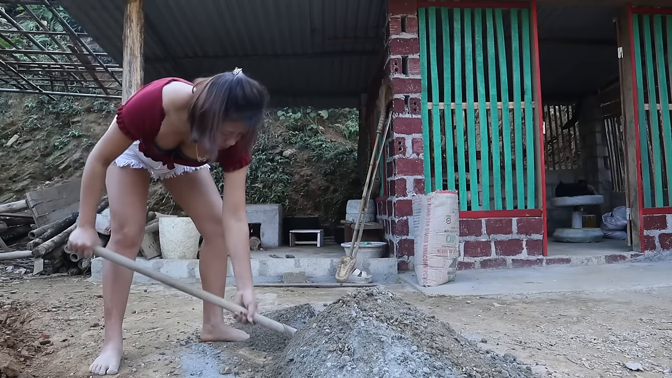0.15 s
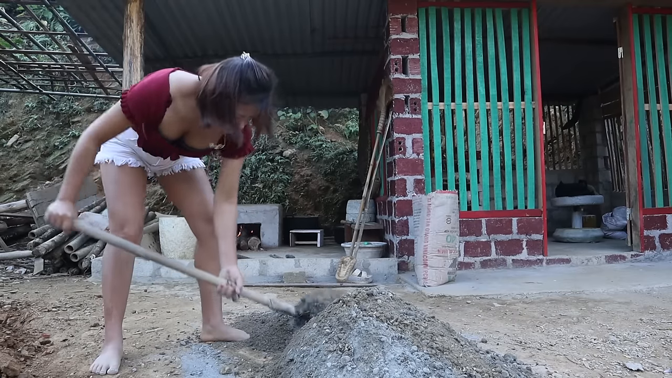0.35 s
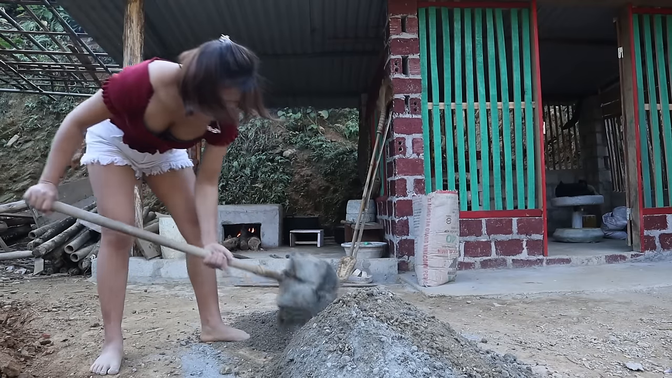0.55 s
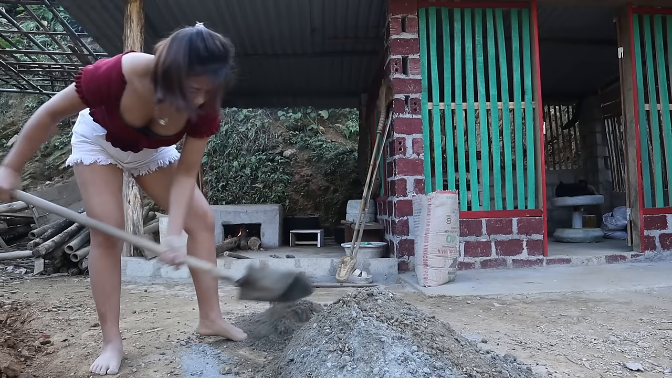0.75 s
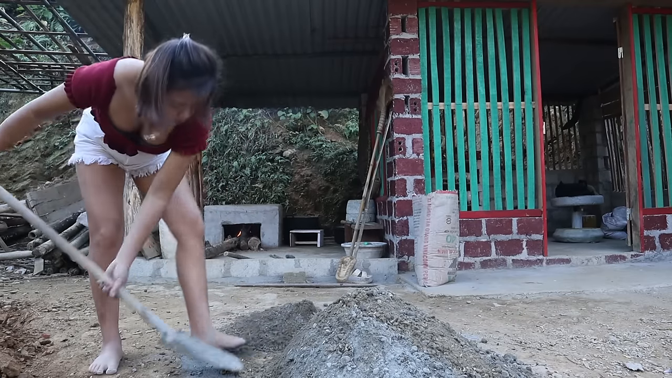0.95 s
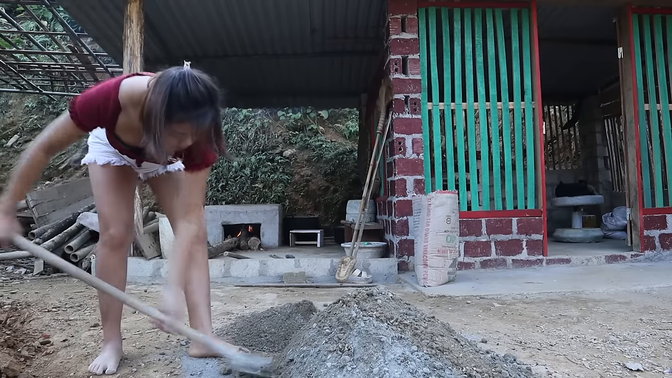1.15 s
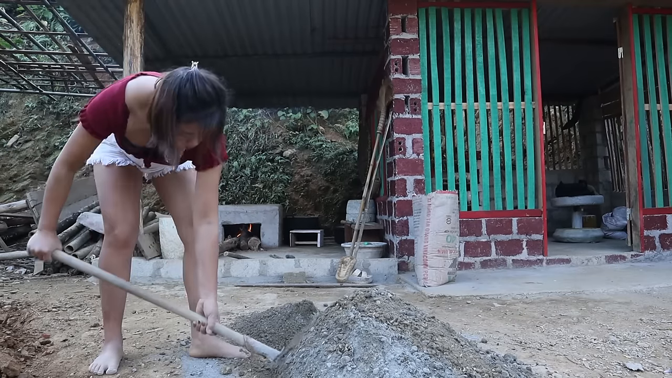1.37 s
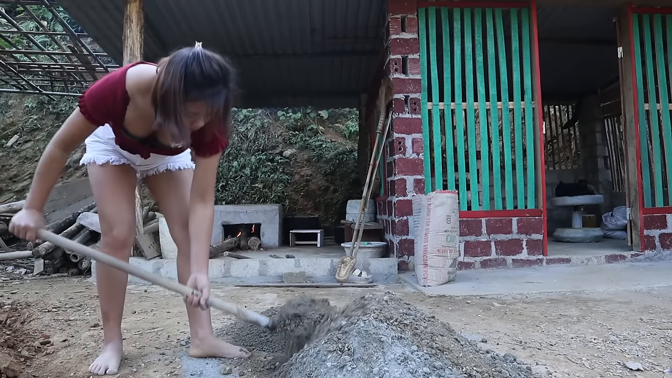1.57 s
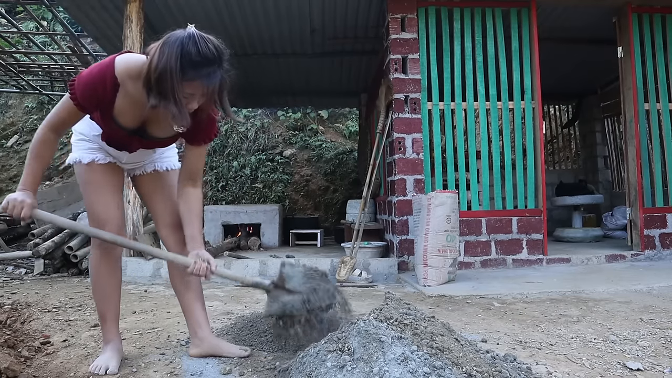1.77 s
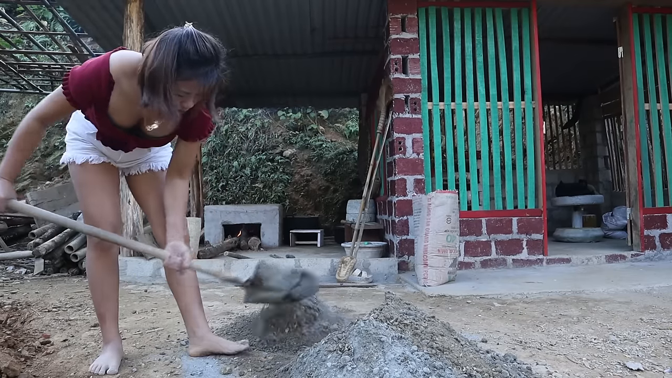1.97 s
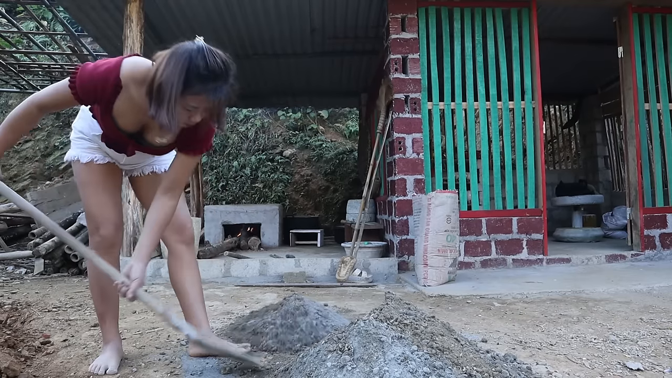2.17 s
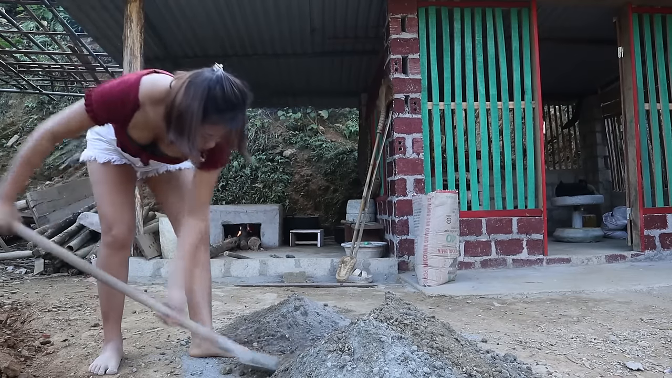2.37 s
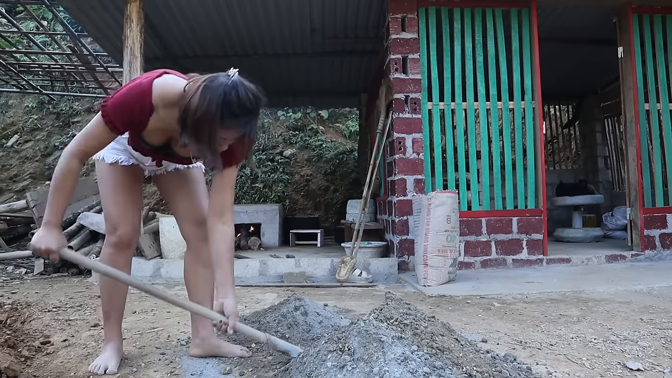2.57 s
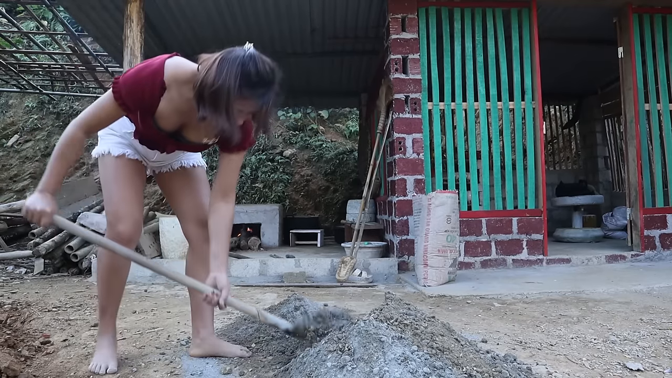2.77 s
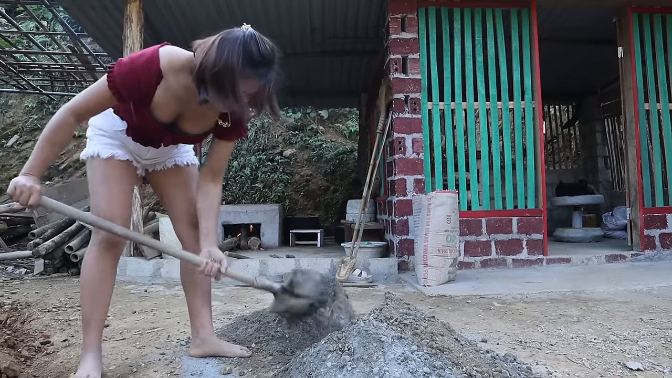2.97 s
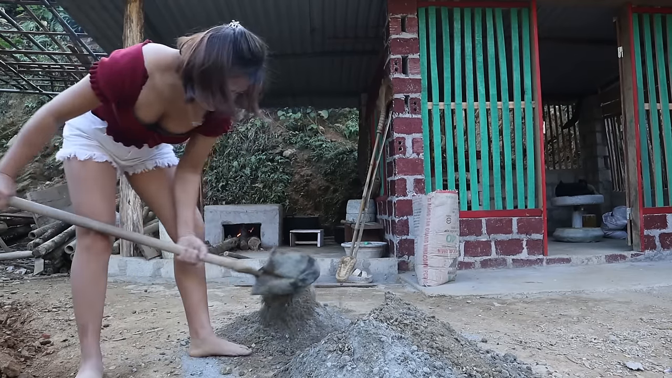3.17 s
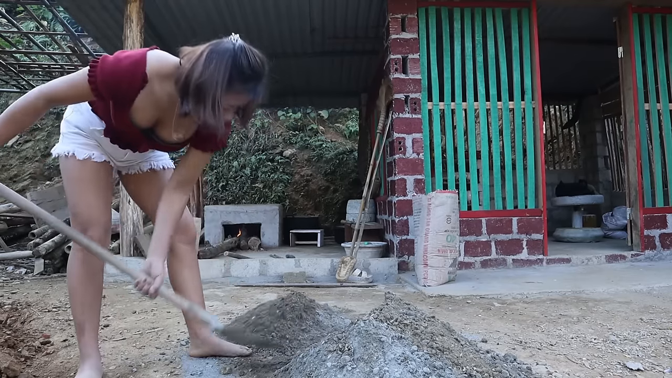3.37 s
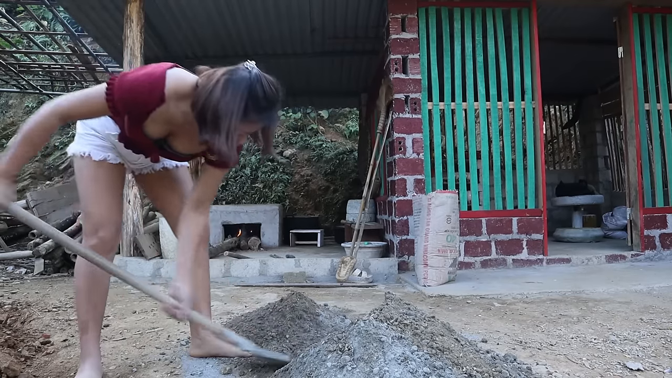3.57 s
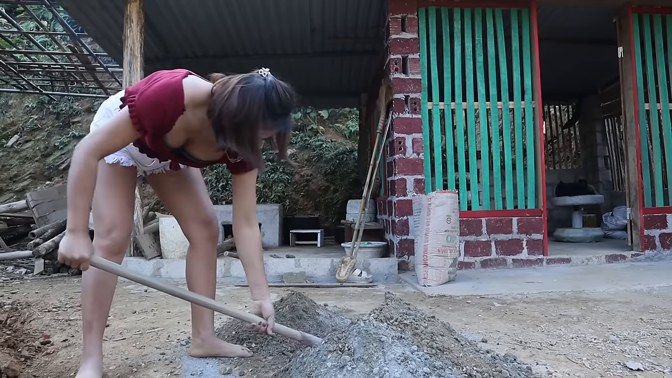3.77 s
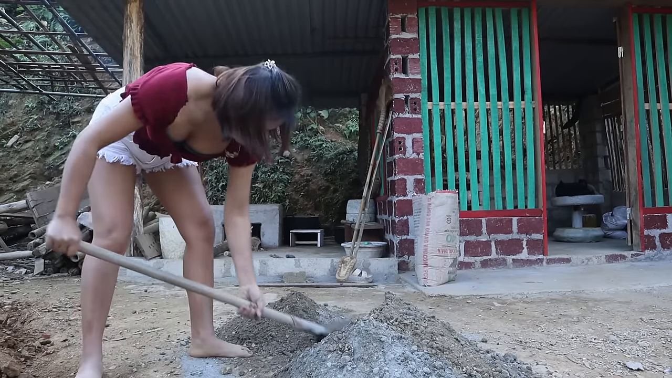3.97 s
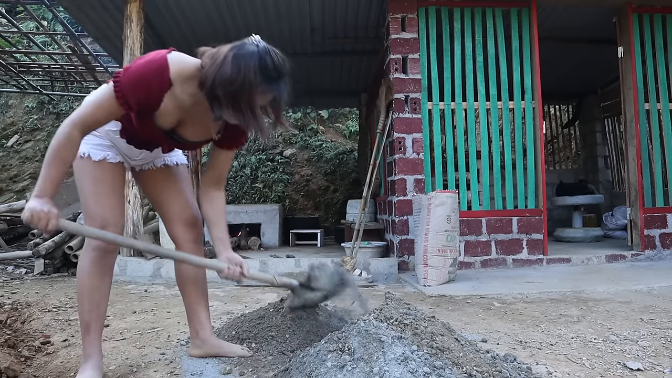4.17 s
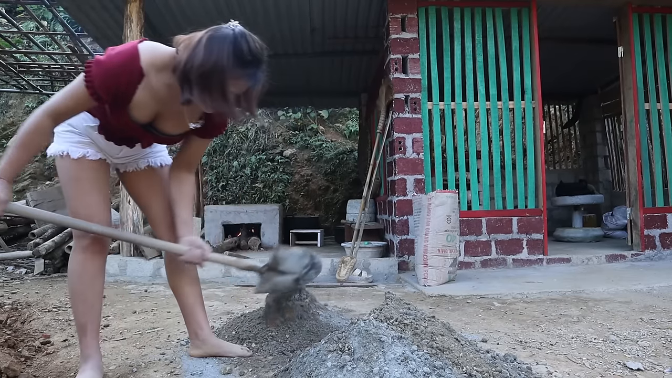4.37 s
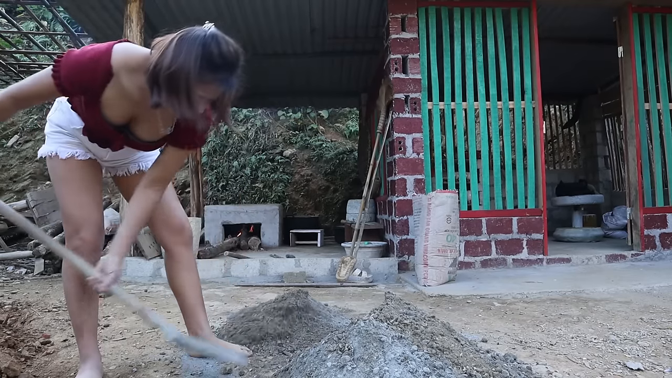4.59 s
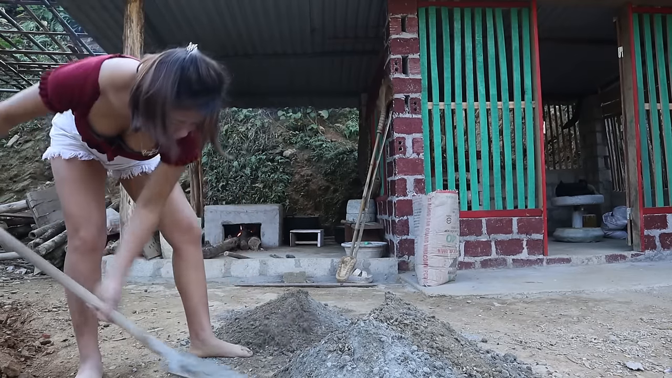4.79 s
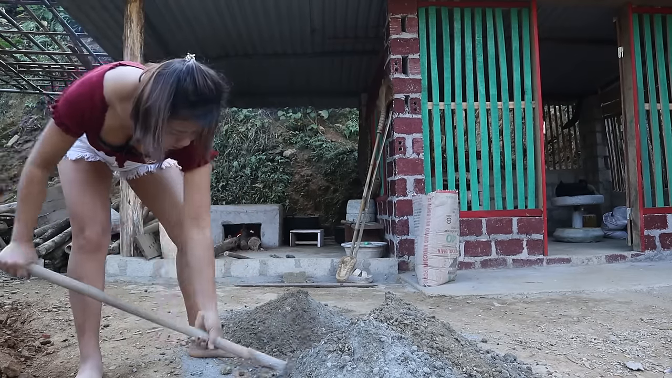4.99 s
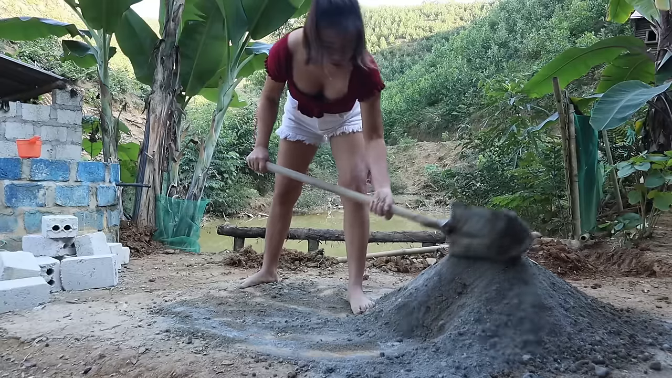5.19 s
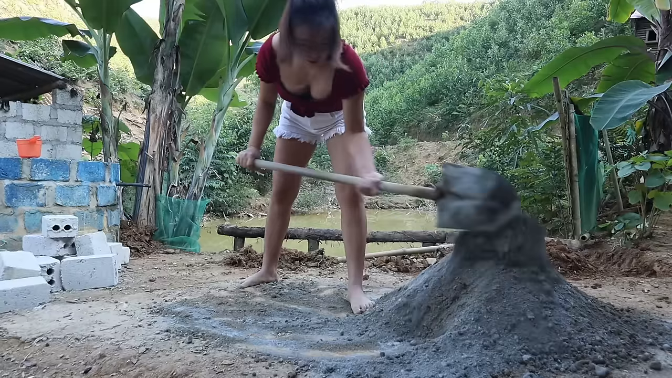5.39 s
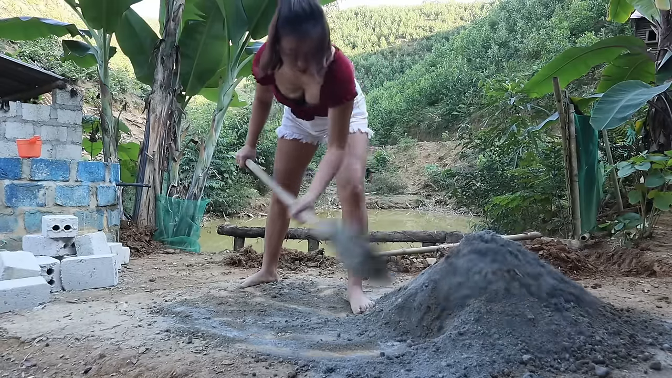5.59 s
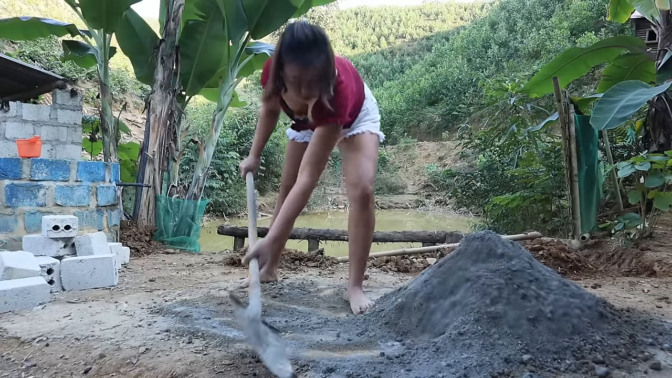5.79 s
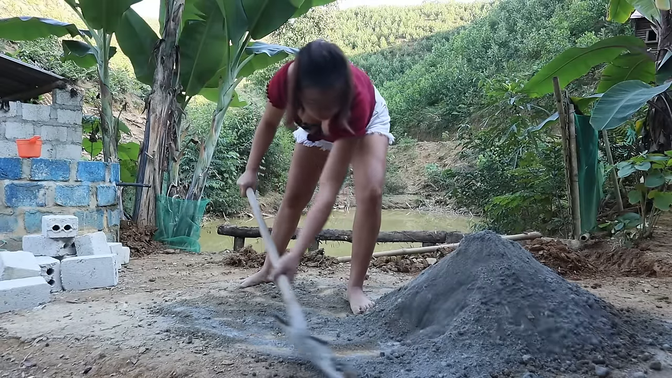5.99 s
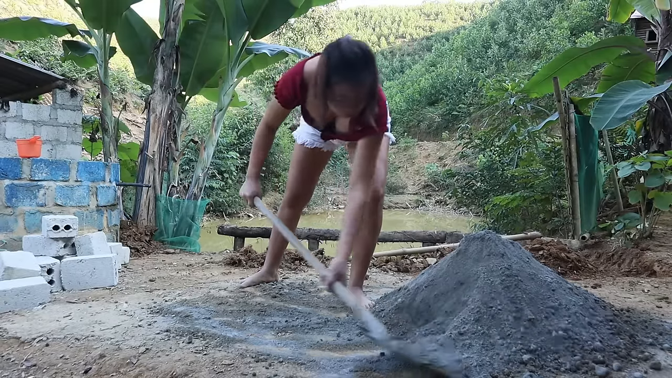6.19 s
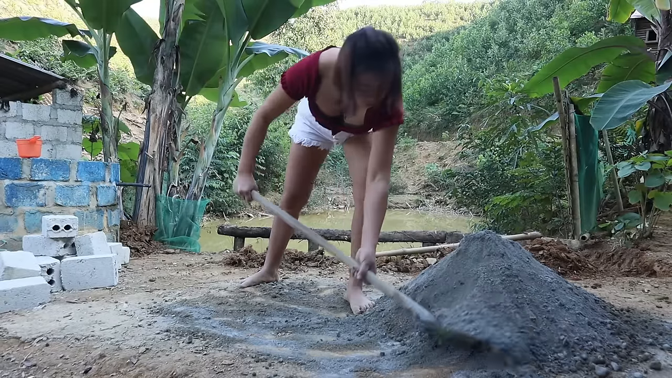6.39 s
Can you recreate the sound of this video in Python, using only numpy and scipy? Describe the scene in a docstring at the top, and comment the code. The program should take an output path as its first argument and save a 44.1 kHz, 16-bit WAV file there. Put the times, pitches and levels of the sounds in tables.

```python
"""A steel shovel turns a heap of dry cement and gravel on hard ground, outdoors, a few metres away.
Again and again the blade lands, grinds under the heap and is tipped out: random grains and short chips
shake the ringing steel, stones knock on it, and sliding mix and sand patter as filtered grains.
After a brief silence the work goes on in a second yard, with a last pour and then a deeper, rasping drag.
Dull knocks, thuds, pebble ticks and a faint ping come between; each yard has its own quiet noisy air."""
import sys
import numpy as np
from scipy import signal
from scipy.fft import rfft, irfft
from scipy.io import wavfile
from scipy.ndimage import uniform_filter1d

SR = 44100
rng = np.random.default_rng(int(sys.argv[2]) if len(sys.argv) > 2 else 0)


def output_pcm(signal):
    """Save a mono or channel-first signal as 16-bit PCM at the path in sys.argv[1].

    Samples are clipped to [-1, 1] before scaling.
    """
    pcm = np.clip(np.atleast_2d(signal).T, -1, 1) * 32767
    wavfile.write(sys.argv[1], SR, np.round(pcm).astype(np.int16))


N = 284004
TIME = np.arange(N) / SR
TAPS = 8192  # length of filters and short bursts, samples
FREQ = np.maximum(np.fft.rfftfreq(TAPS, 1 / SR), 1)  # Hz, kept above zero for logarithms
GAP_START, GAP_END = 5.13, 5.169  # brief silence between the two yards, s

# modes of the blade resting on the ground: f/Hz, width/Hz, lift/dB
BLADE_MODES = [(219, 64, 8), (523.6, 39, 5), (665.4, 88, 7), (734.4, 24, 8), (1022, 36, 8.5),
               (1283, 54, 6.5), (1380, 42, 9.5), (1490, 33, 5.5), (1776, 36, 2.5), (1920, 54, 6.5),
               (1950, 47, -0.5), (2107, 120, 4.5), (2380, 49, 4), (2654, 34, 5.5), (2834, 115, 3.5),
               (3155, 200, 2), (3480, 170, 3.5), (4010, 87, 5), (4600, 85, 3)]


def undb(db):
    """Turn decibels into a plain gain."""
    return 10 ** (np.asarray(db) / 20)


def spectrum(points):
    """Join (Hz, value) points by straight lines on a log-frequency axis."""
    hz, value = np.transpose(points)
    return np.interp(np.log(FREQ), np.log(hz), value)


def resonances(modes):
    """Lift in dB that a set of modes gives to each frequency."""
    return sum(db / (1 + (2 * (FREQ - hz) / width) ** 2) for hz, width, db in modes)


def slope(ratio, order=8):
    """Roll-off in dB where the frequency ratio exceeds one; a higher order is steeper."""
    return -10 * np.log10(1 + ratio ** order)


def response(db):
    """Turn a dB curve into a filter that answers at once (minimum phase), with unit energy."""
    cepstrum = irfft(np.log(undb(db)))
    # folding the second half onto the first leaves nothing before the start
    cepstrum[1:TAPS // 2] *= 2
    cepstrum[TAPS // 2 + 1:] = 0
    h = irfft(np.exp(rfft(cepstrum)))
    return h / np.linalg.norm(h)


def through(x, h):
    """Pass a signal through an impulse response."""
    return signal.fftconvolve(x, h)[:N]


def walk(rate):
    """Smooth random wander with a spread near one; a higher rate wanders faster."""
    k = max(int(SR / rate), 2)
    steps = np.repeat(rng.standard_normal(N // k + 1), k)
    return 1.3 * uniform_filter1d(uniform_filter1d(steps, k), k)[:N]


def envelope(db, active):
    """Gain for a level in dB, silent while not active, with softened edges."""
    return uniform_filter1d(undb(db) * active, size=128)


def add(track, s, sound):
    """Mix a short sound in at time s."""
    start = int(s * SR)
    track[start:start + len(sound)] += sound[:N - start]


def grains(rate, spread_db):
    """Random contacts (rate per second), many small and a few large; rms one."""
    size = undb(spread_db * np.minimum(rng.exponential(size=N), 5))
    hits = rng.random(N) < rate / SR
    x = hits * size * rng.choice([-1, 1], N)
    return x / x.std()


def burst(t60, crack):
    """Force of a blow: one sharp push and a dying chatter of crushed grit."""
    force = rng.standard_normal(TAPS) * undb(-60 * np.arange(TAPS) / SR / t60)
    force[0] = crack
    return force


def shovel(db, body_hz=900, grit_hz=4000):
    """Split the steel's answer into loaded low body, middle ring and the grit at the edge above it."""
    low, high = FREQ / body_hz, FREQ / grit_hz
    ring = response(db + slope(1 / low) + slope(high))
    body = response(db + slope(low))
    grit = response(db + slope(1 / high))
    return ring, body, grit


def scooping_colour():
    """Spectrum in dB of scooping: the force of the contacts plus the modes of the resting blade."""
    # contact force when scooping: f/Hz, level/dB
    force_colour = [(50, -30), (110, -20.5), (170, -11.5), (400, -8.5), (650, -4.5), (880, -7), (1150, -3),
                    (1600, 0), (2500, 1), (4000, -5), (6000, -10.5), (8000, -16), (11000, -23.5),
                    (15000, -40)]
    return spectrum(force_colour) + resonances(BLADE_MODES)


def dragging_colour():
    """Spectrum in dB of dragging: the contact force plus weaker blade modes and those of the pressed edge."""
    # contact force when dragging: f/Hz, level/dB
    force_colour = [(50, -25), (110, -13.5), (220, -5), (400, -5), (700, -1.5), (900, -2.5), (1600, -3),
                    (2600, -0.5), (4000, -9), (6000, -17.5), (8000, -23), (11000, -28), (15000, -48)]
    # shaft and blade pressed on edge against the ground: f/Hz, width/Hz, lift/dB (before the 0.77 below)
    edge_modes = [(122, 20, 20.5), (213, 20, 8.5), (310, 17, 9), (434.5, 22, 11.5), (670, 63, 5),
                  (1040, 27, 9.5), (1468, 50, 10), (2050, 120, 5.5), (2680, 110, -0.5), (3370, 83, 6.5)]
    return spectrum(force_colour) + 0.79 * resonances(BLADE_MODES) + 0.77 * resonances(edge_modes)


def effort(s, build_s, hold_s, contact_db, release_db_per_s):
    """The push builds from first contact, holds, then eases off, while the blade fills; both in dB."""
    rounding_s = 0.025  # how gently the push turns into its release
    empty_body_db, loading_db_per_s = -6, 27  # low body when empty; its gain while the push eases
    building = np.clip((TIME - s) / build_s, 0, 1)
    filling = np.clip((TIME - s) / (build_s + hold_s), 0, 1)
    past = np.maximum(TIME - s - build_s - hold_s, 0)
    easing_s = np.hypot(past, rounding_s) - rounding_s
    push_db = contact_db * (1 - building) - release_db_per_s * easing_s
    load_db = empty_body_db * (1 - filling) + loading_db_per_s * np.minimum(easing_s, .15)
    return push_db, load_db


def chips(s, rate=520, low_hz=900, high_hz=10000, cycles=14):
    """Single stones stick and slip on the steel, each at its own pitch; rms one from s[0] to s[-1]."""
    out, t = np.zeros(N), np.arange(1500) / SR
    length_s = s[-1] - s[0]
    for when, pitch, size in rng.random((int(rate * length_s), 3)):
        hz = low_hz * (high_hz / low_hz) ** pitch
        age = t * hz / cycles * 2
        # higher chips are shorter, sharper and stronger; each stone's size is drawn apart from its pitch
        chip = hz * np.exp(-age) * np.sin(2 * np.pi * hz * t)
        add(out, s[0] + when * length_s, (0.22 + size ** 2) * chip)
    return out / np.sqrt(np.sum(out ** 2) / SR / length_s)


def scrape(stroke, parts, rate, spread_db, judder_db, judder_hz, stony, gain_db):
    """Stones catch and slip under the juddering edge, fewer as the push eases; gives sound and pressure."""
    s, build_s, hold_s, db, contact_db, release_db_per_s, body_db, grit_db = stroke
    push_db, load_db = effort(s, build_s, hold_s, contact_db, release_db_per_s)
    active = (TIME >= s) & (db + push_db > -70)  # the blade leaves the ground at -70 dB
    part_levels = (0, body_db + load_db, grit_db)
    pushes = [envelope(db + push_db + part_db, active) for part_db in part_levels]
    density = np.maximum(undb(.5 * push_db), .15)
    thinning = np.sqrt(density.mean() / density)  # fewer grains, each stronger
    judder = undb(judder_db * walk(judder_hz))
    judder *= undb(gain_db) / np.sqrt(np.mean(judder ** 2))
    stones = chips(TIME[active])
    sound = np.zeros(N)
    # chips ring in the steel and the grit, not in the low body
    for share, push, part in zip((stony, 0, stony), pushes, parts):
        sand = grains(rate * density, spread_db) * thinning
        force = np.sqrt(1 - share) * sand + np.sqrt(share / 2) * stones
        sound += through(force * judder * push, part)
    return sound, undb(push_db) * active


def scoops():
    """Push the blade under the heap; the edge that bears on the ground lifts or dulls one region."""
    # start t/s, build-up/s, full push/s, ring level/dB (before gain_db), first contact re full push/dB,
    # release/(dB per s), low body re ring/dB, grit re ring/dB,
    # region lifted or dulled f/Hz, its width/Hz, its lift/dB (dulled if negative)
    scoop_table = [(0.0, .005, .008, -28.5, -0.5, 201.5, -7, -8, 1403, 160, 7),
                   (1.11, 0.11, 0.036, -28, -13.5, 269.5, -9, -6.5, 1840, 90, -2),
                   (2.335, 0.12, 0.074, -27, -17, 290, -6, -8, 333, 80, 6),
                   (3.567, .14, .065, -30.5, -7.5, 234.5, -4, -7.5, 840, 300, 5.5),
                   (4.835, .068, .102, -25.5, -18, 275, -8, -7, 1335, 50, 10)]
    strokes = []
    for *stroke, hz, width_hz, lift_db in scoop_table:
        parts = shovel(scooping_colour() + resonances([(hz, width_hz, lift_db)]))
        strokes.append(scrape(stroke, parts, rate=8000, spread_db=2.5, judder_db=-0.85,
                              judder_hz=129.0, stony=0.23, gain_db=-2.94))
    return np.sum(strokes, axis=0)


def drags():
    """Drag the blade over the ground: sparser contacts and a stronger judder give a deep rasp."""
    # start t/s, build-up/s, full push/s, ring level/dB (before gain_db), first contact re full push/dB,
    # release/(dB per s), low body re ring/dB, grit re ring/dB
    drag_table = [(5.895, .005, 0.023, -45.5, -16, 42, -9, -11.5),
                  (6.005, .04, 0.046, -34.5, -9, 72, -3, -11),
                  (6.19, 0.03, .17, -34.5, -8.5, 179, 1, -11.5)]
    parts = shovel(dragging_colour())
    strokes = [scrape(stroke, parts, rate=2400, spread_db=3.0, judder_db=1.66,
                      judder_hz=101, stony=0.33, gain_db=-3.0) for stroke in drag_table]
    return np.sum(strokes, axis=0)


def strikes(pressure, looseness=0.46, width_hz=130):
    """A blow rings the blade more than steady pressure; the spot hit lifts or dulls one region."""
    # steel meets ground or catches a stone: t/s, ring peak/dB, low body re ring/dB, grit re ring/dB,
    # region lifted or dulled f/Hz, its lift/dB (dulled if negative)
    strike_table = [(1.0983, -33.5, -7, -5, 1600, 17), (1.1072, -24.5, -20, -3, 1410, 9),
                    (1.1493, -29.5, -6, -14, 1900, 9), (1.1652, -19, -15, -26, 1820, 16),
                    (2.3278, -34.5, -35, -11, 1870, 9), (2.357, -29.5, -5.5, -7.5, 1300, 9),
                    (2.4614, -19, -11.5, -7, 2890, 19), (2.4904, -22.5, -24, -20, 1410, 13),
                    (2.538, -23, -31, -22, 2146, 24), (3.5641, -26.5, -11.5, -7, 1910, -3),
                    (3.6088, -27, 1.5, -26, 1410, 6), (4.7788, -33, -36, -15, 1340, 10),
                    (4.786, -27.5, -42, -16.5, 2060, 13), (4.8346, -32, -15, -6.5, 1360, 4),
                    (4.907, -20, -23, -7, 1280, 15), (5.894, -28, -10, -11.5, 1600, 8),
                    (6.0281, -23.5, -11, -11.5, 2040, 4), (6.0867, -27.5, -1, -19, 1480, 16.5),
                    (6.128, -30.5, -20, 0, 2020, 12), (6.2104, -32, 8, -7, 2080, 9),
                    (6.2356, -24.5, 8, -8.5, 1960, 15), (6.3224, -26, -2, -12, 1240, 18),
                    (6.345, -20, -1.5, -11.5, 1827, 20)]
    # chatter t60/s of a lightly resting blade, then of one pressed hard, which stops sooner
    chatter_t60 = (0.11, 0.055)
    out = np.zeros(N)
    scooping, dragging = scooping_colour(), dragging_colour()
    for s, db, body_db, grit_db, hz, lift_db in strike_table:
        colour = (scooping if s < GAP_END else dragging) + looseness * resonances(BLADE_MODES)
        ring, body, grit = shovel(colour + resonances([(hz, width_hz, lift_db)]))
        force = burst(np.interp(pressure[int(s * SR)], (0, 1), chatter_t60), crack=4.3)
        peak = np.abs(signal.fftconvolve(force, ring)).max()
        blow = signal.fftconvolve(force, ring + undb(body_db) * body + undb(grit_db) * grit)
        add(out, s, undb(db) * blow / peak)
    return out


def pours(gain_db=-5.5, patter_db=-17, fall_s=0.057, width_hz=700, lift_db=7):
    """Mix slides off the lifted blade, which rings freely; stones clink on it; sand patters after."""
    # mix sliding off: fullest flow t/s, flow level/dB (before gain_db or patter_db), time at fullest flow/s
    pour_table = [(.652, -53, 0.0092), (1.922, -49, 0.03), (3.145, -49.5, 0.066), (4.342, -56.5, 0.035),
                  (5.33, -58.5, 0.11)]
    # stones knocking on the lifted blade: t/s, peak/dB, favoured f/Hz
    stone_table = [(0.655, -41.5, 2130), (1.077, -49, 1500), (1.917, -40.5, 2920), (1.96, -41, 2500),
                   (3.159, -41, 2640), (3.177, -38, 2670), (5.371, -39, 2830), (5.887, -35, 3020)]
    # force of the sliding mix: f/Hz, level/dB
    force_colour = [(200, -35), (900, -0.5), (1300, -1), (1600, -1.5), (2600, 6), (3500, 4), (5000, -5.5),
                    (8000, -13.5), (14000, -32)]
    # modes of the blade lifted clear of the ground: f/Hz, width/Hz, lift/dB
    lifted_modes = [(960, 45, 1), (1293, 69, 18), (1400, 37, 17), (1900, 82, 16.5), (2132, 25, 14.5),
                    (2220, 34, 13), (2680, 47, 15), (2920, 100, 3), (3390, 56, 8), (3990, 40, 8)]
    rise_db_per_s, fall_db_per_s = 270, 240
    flow = np.zeros(N)
    for s, db, hold_s in pour_table:
        rise_db = rise_db_per_s * np.maximum(s - TIME, 0)
        fall_db = fall_db_per_s * np.maximum(TIME - s - hold_s, 0)
        flow += undb(db - rise_db - fall_db)
    steel = spectrum(force_colour) + resonances(lifted_modes)
    out = undb(gain_db) * through(grains(rate=2700, spread_db=5.5) * flow, response(steel))
    for s, db, hz in stone_table:
        # a stone that stays on the steel damps its modes
        colour = steel - 0.11 * resonances(lifted_modes) + resonances([(hz, width_hz, lift_db)])
        clink = signal.fftconvolve(burst(t60=0.049, crack=4.7), response(colour))
        add(out, s, undb(db) * clink / np.abs(clink).max())
    # sand lands a little later and more spread out than the mix slides
    falling = uniform_filter1d(np.interp(TIME - fall_s, TIME, flow), size=12000)
    drops = grains(rate=900, spread_db=3)
    sand_colour = slope(3500 / FREQ, order=4) + slope(FREQ / 9000)
    return out + undb(patter_db) * through(drops * falling, response(sand_colour))


def knocks(sharpness=3.7):
    """Wood and packed earth answer with one quickly damped resonance."""
    # handle, clods and loaded blade on hard earth: t/s, peak/dB, centre f/Hz, t60/s of the force
    knock_table = [(0.141, -43.5, 323, 0.13), (0.561, -41.5, 190, 0.025), (1.24, -32.5, 170, 0.12),
                   (2.504, -29, 215, 0.046), (2.68, -37, 660, 0.05), (2.694, -45, 720, 0.052),
                   (3.858, -40, 450, 0.17), (4.97, -30, 256, 0.23), (5.012, -23, 600, 0.065),
                   (5.503, -44, 1180, 0.048), (5.545, -40.5, 1080, 0.067), (5.565, -42, 1130, 0.065),
                   (6.237, -26, 450, 0.15), (6.275, -27.5, 239, 0.23), (6.322, -18.5, 320, 0.21),
                   (6.35, -32, 217, 0.16)]
    out = np.zeros(N)
    for s, db, hz, t60 in knock_table:
        resonance = slope(sharpness * (FREQ / hz - hz / FREQ), order=2)
        wood = response(resonance + slope(FREQ / (6.3 * hz), order=4))
        knock = signal.fftconvolve(burst(t60, crack=15.6), wood)
        add(out, s, undb(db) * knock / np.abs(knock).max())
    return out


def thuds(hz=49, length_s=0.035):
    """A cycle or two of deep pressure that swells and dies."""
    # soft low thuds: t/s, level/dB of the sine at full swell
    thud_table = [(0.65, -56), (1.556, -43), (1.689, -47), (1.719, -48.5), (2.826, -47), (3.015, -48),
                  (3.052, -49)]
    out, t = np.zeros(N), np.arange(int(length_s * SR)) / SR
    for s, db in thud_table:
        add(out, s, undb(db) * np.sin(np.pi * t / length_s) * np.sin(2 * np.pi * hz * t))
    return out


def pebbles(decay_s=0.0026):
    """Single small stones tick as they land: very short noise bursts, mostly treble."""
    # lone pebbles on the heap: t/s, peak/dB
    pebble_table = [(1.7644, -54), (1.988, -45), (2.0996, -45.5), (4.188, -55), (4.5146, -52), (5.563, -49)]
    out, t = np.zeros(N), np.arange(TAPS) / SR
    stone = response(slope(4500 / FREQ, order=4) + slope(FREQ / 10000))
    for s, db in pebble_table:
        tick = signal.fftconvolve(rng.standard_normal(TAPS) * np.exp(-t / decay_s), stone)
        add(out, s, undb(db) * tick / np.abs(tick).max())
    return out


def ping(s=3.449, hz=2762, db=-58, rise_s=0.0088):
    """A faint thin ping while the shovel swings back: one sine that swells fast and dies."""
    age = np.maximum(TIME - s, 0) / rise_s
    return undb(db) * age * np.exp(1 - age) * np.sin(2 * np.pi * hz * TIME)


def place(x, bearing, wall_db, t60):
    """The treble leads in one channel (left if bearing > 0); ground and walls scatter a short, wide tail."""
    # lead between the channels at a bearing of one: f/Hz, phase/rad
    phase_table = [(100, .01), (2300, 0.31), (4000, 0.97), (6000, 1.36), (8500, 2.02), (11000, 2.7),
                   (15000, 3.2)]
    lead = np.interp(np.fft.rfftfreq(N, 1 / SR), FREQ, spectrum(phase_table)) * bearing
    walls = response(spectrum([(200, -22), (1000, -7.5), (2500, 2), (5000, 1.5), (12000, 6.5)]))
    t, out = np.arange(SR // 2) / SR, []
    for sign in (1, -1):  # left, right
        direct = irfft(rfft(x) * np.exp(sign * .5j * lead), N)
        tail = rng.standard_normal(len(t)) * undb(-60 * t / t60) * (t > .003)
        scattered = through(through(direct, tail / np.linalg.norm(tail)), walls)
        out.append(direct + undb(wall_db) * scattered)
    return np.array(out)


def air(colour, db, waver_db=0.77, rumble_db=2.8):
    """Wide, quiet outdoor noise whose low rumble swells unevenly."""
    # width of the air: f/Hz, side re mid/dB
    width_table = [(60, -12.5), (110, -14), (200, -2), (400, 1.5), (1300, 4.5), (5000, 1), (14000, 6.5)]
    shape, wide = spectrum(colour), spectrum(width_table)
    swell = undb(rumble_db * walk(20))
    mid = through(rng.standard_normal(N), response(shape))
    # the part below 200 Hz swells on its own
    rumble = signal.sosfilt(signal.butter(2, 200, fs=SR, output="sos"), mid)
    mid = mid + rumble * (swell / swell.mean() - 1)
    side_gain = np.linalg.norm(undb(shape + wide)) / np.linalg.norm(undb(shape))
    side = through(rng.standard_normal(N), response(shape + wide)) * side_gain
    return np.array([mid + side, mid - side]) * undb(db + waver_db * walk(7.4))


def scene():
    """Scoops and pours in the first yard, a last pour and a long drag in the second."""
    # still air of each yard with a thin far hiss near 6 kHz: f/Hz, relative level/(dB per Hz)
    first_air = [(25, -3), (60, 0.5), (130, 0.5), (260, -5.5), (700, -10.5), (1300, -14.5), (3000, -18),
                 (5000, -22), (5700, -16.5), (6500, -20), (7300, -28.5), (11000, -38), (15000, -52.5)]
    second_air = [(25, -7), (60, 7.5), (130, 1.5), (260, -1.5), (700, -6.5), (1300, -9), (3000, -14),
                  (5000, -17), (5700, -16), (6500, -17), (7300, -26), (11000, -35.5), (15000, -53)]
    scraping, pressure = scoops() + drags()
    work = scraping + strikes(pressure) + pours() + knocks() + thuds() + pebbles() + ping()
    first = place(work, bearing=0.84, wall_db=-8.0, t60=0.14) + air(first_air, db=-59.5)
    second = place(work, bearing=-0.73, wall_db=-4.0, t60=0.19) + air(second_air, db=-59.5)
    return first * envelope(0, TIME < GAP_START) + second * envelope(0, TIME > GAP_END)


def record(dry):
    """Cut the treble steeply above 15.2 kHz."""
    return signal.sosfilt(signal.ellip(8, .2, 70, 15200, fs=SR, output="sos"), dry)


dry = scene()
out = record(dry)
output_pcm(out)
```